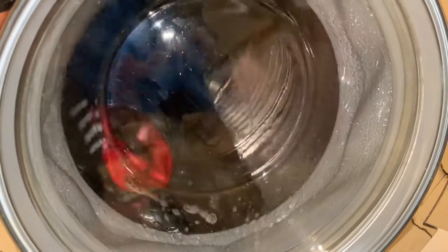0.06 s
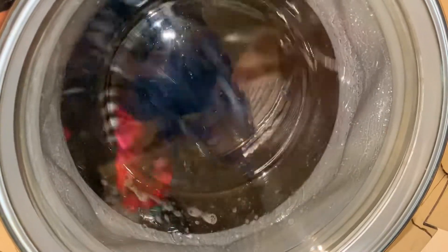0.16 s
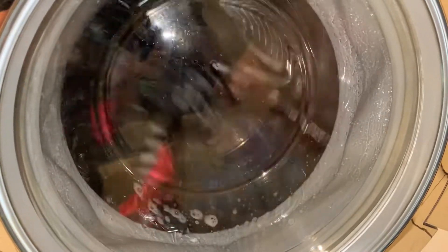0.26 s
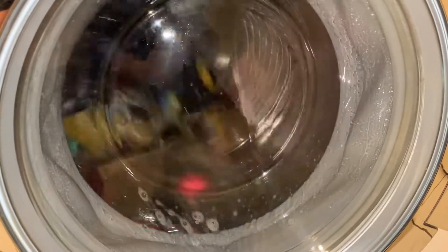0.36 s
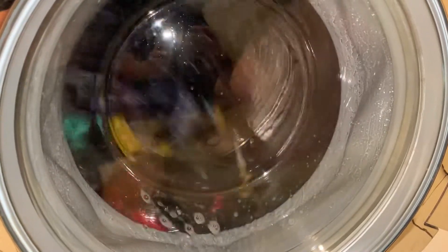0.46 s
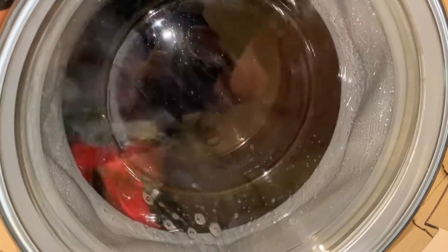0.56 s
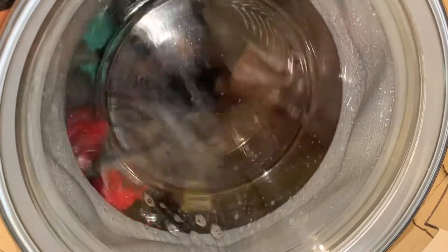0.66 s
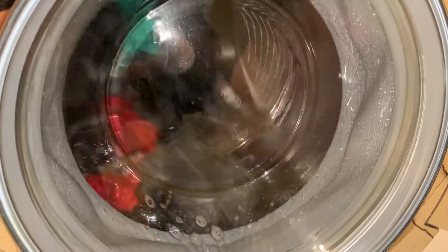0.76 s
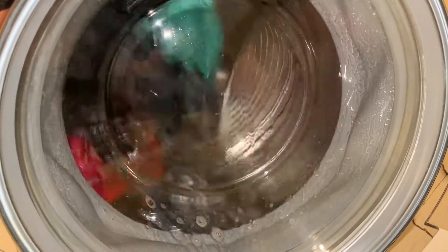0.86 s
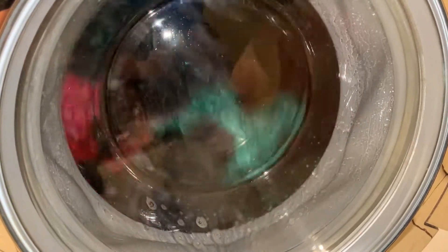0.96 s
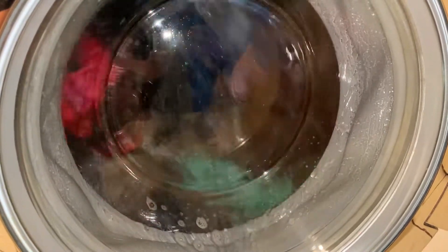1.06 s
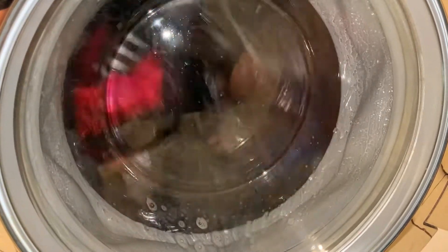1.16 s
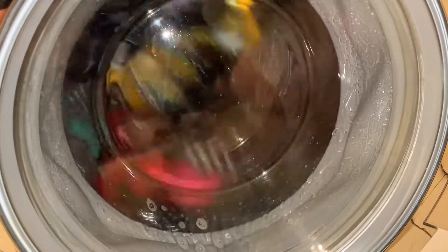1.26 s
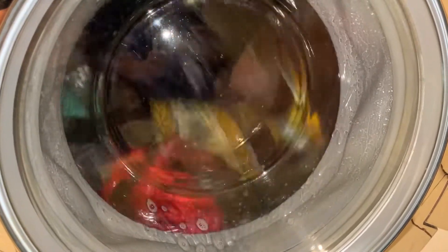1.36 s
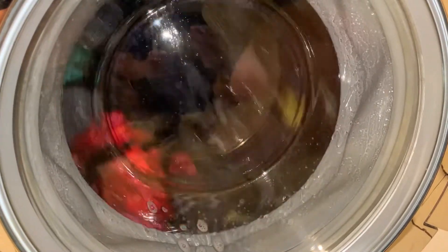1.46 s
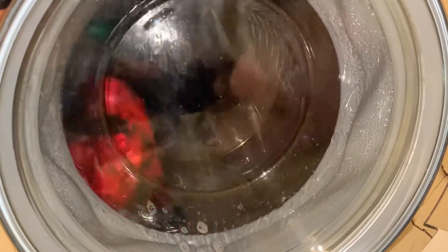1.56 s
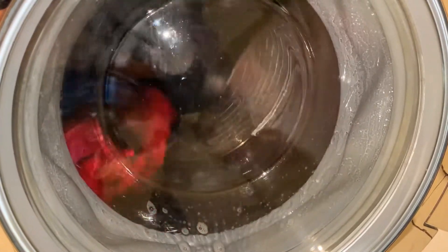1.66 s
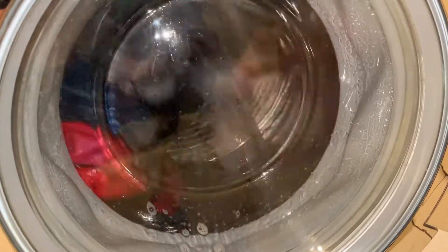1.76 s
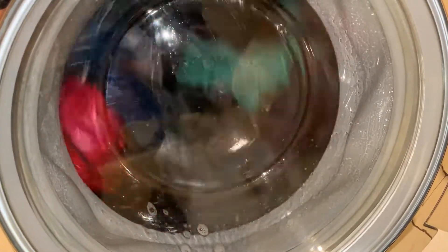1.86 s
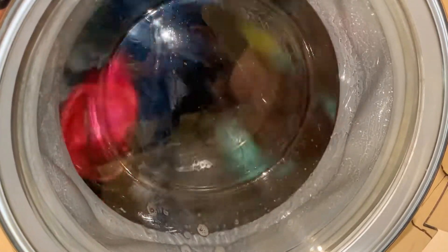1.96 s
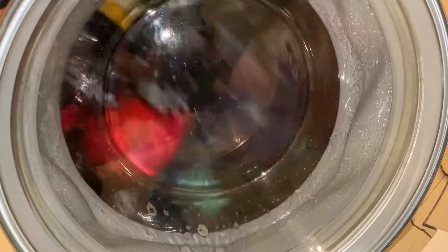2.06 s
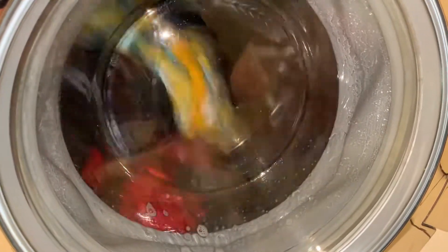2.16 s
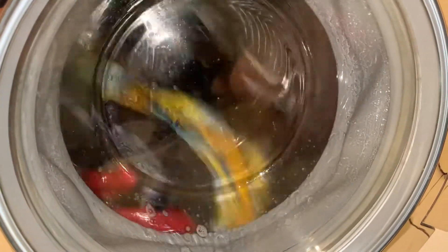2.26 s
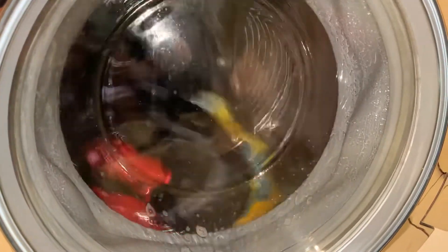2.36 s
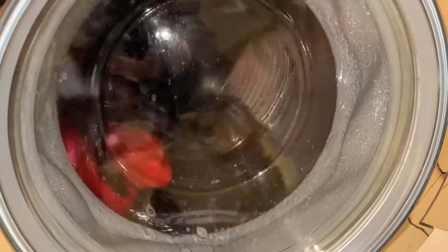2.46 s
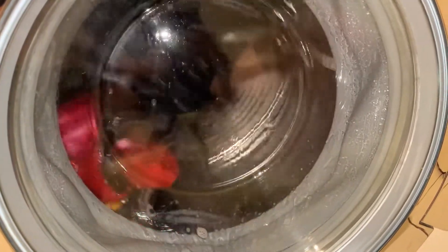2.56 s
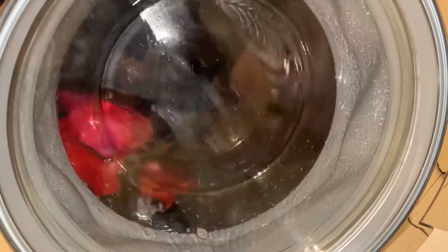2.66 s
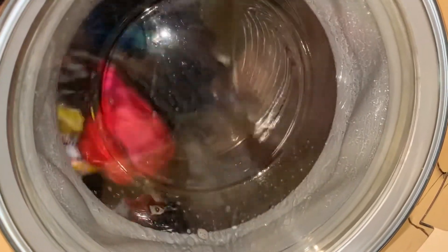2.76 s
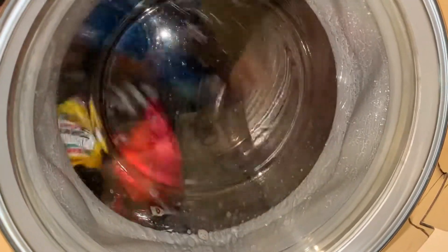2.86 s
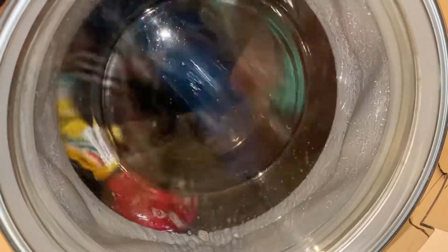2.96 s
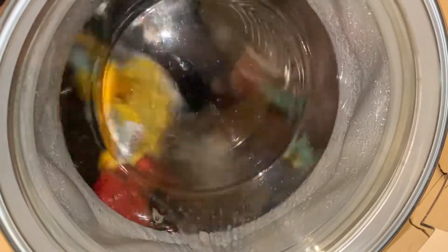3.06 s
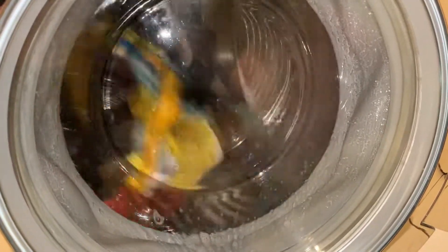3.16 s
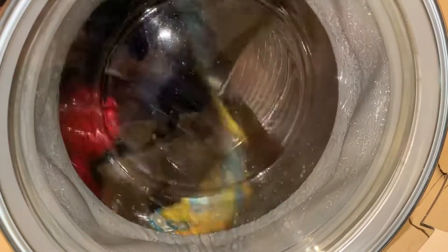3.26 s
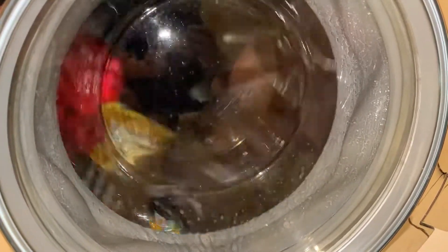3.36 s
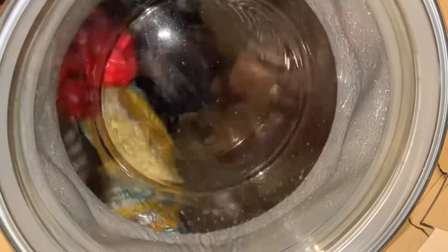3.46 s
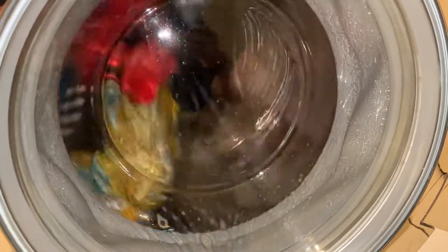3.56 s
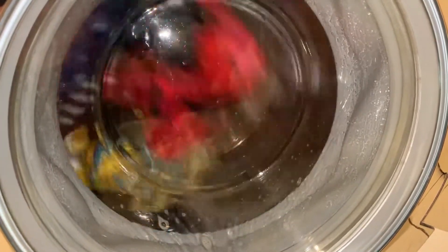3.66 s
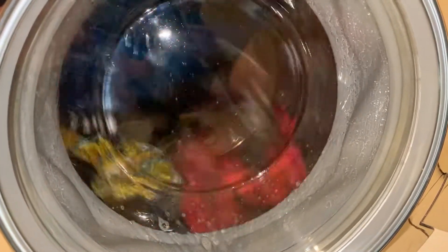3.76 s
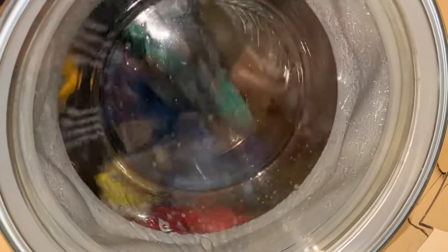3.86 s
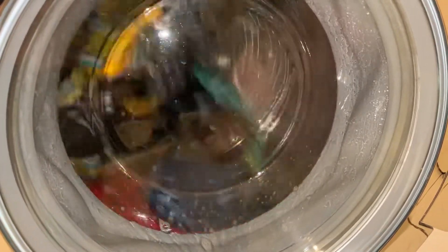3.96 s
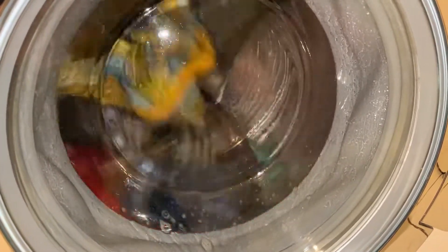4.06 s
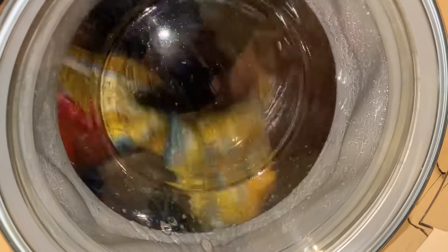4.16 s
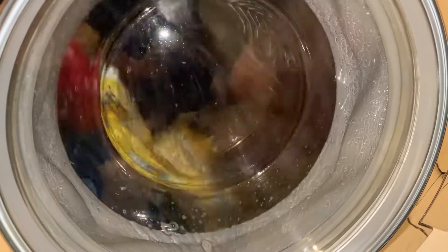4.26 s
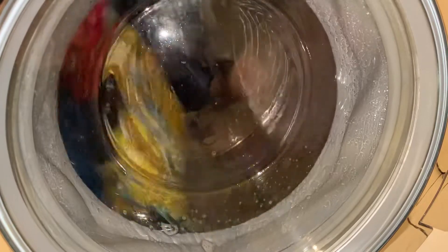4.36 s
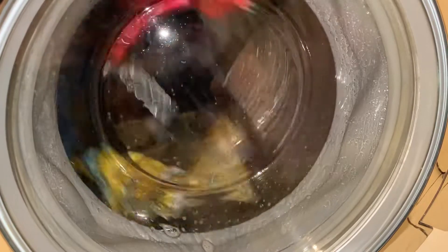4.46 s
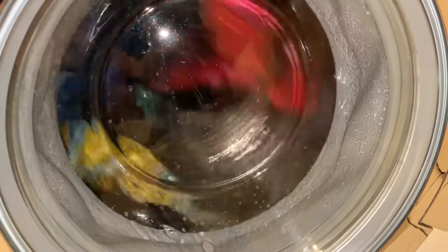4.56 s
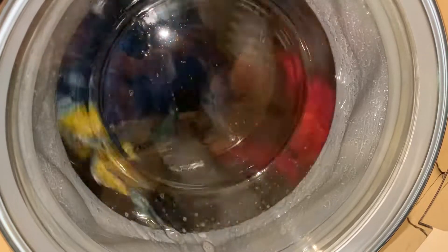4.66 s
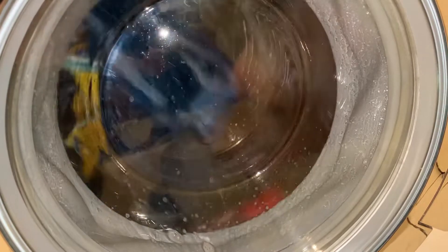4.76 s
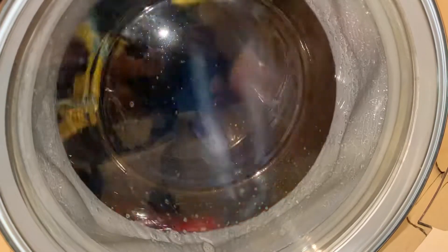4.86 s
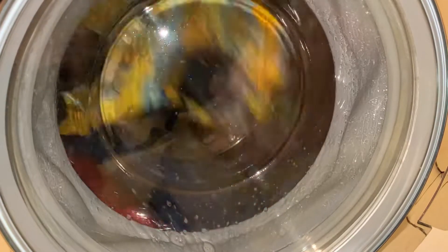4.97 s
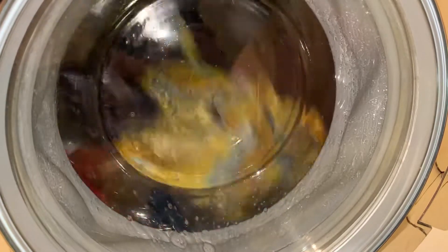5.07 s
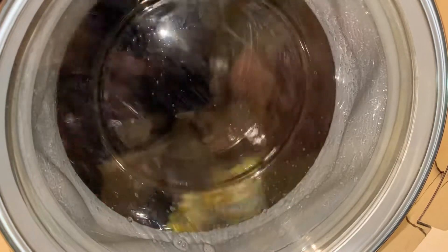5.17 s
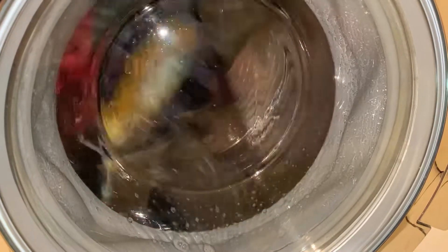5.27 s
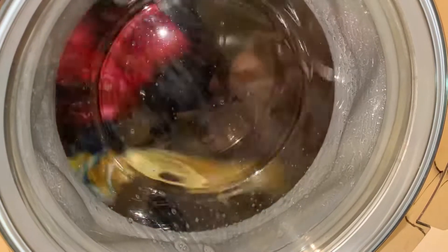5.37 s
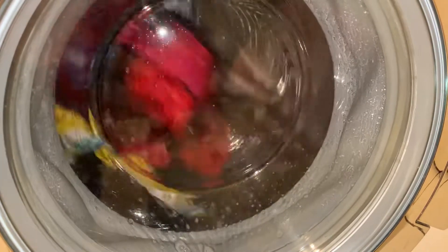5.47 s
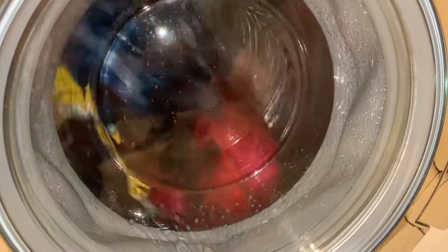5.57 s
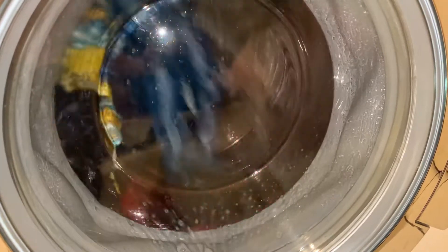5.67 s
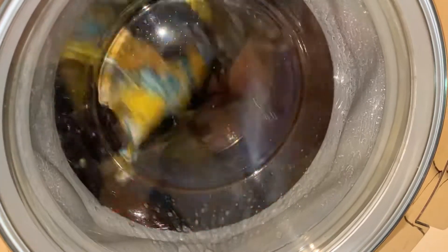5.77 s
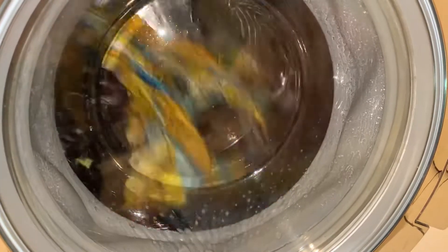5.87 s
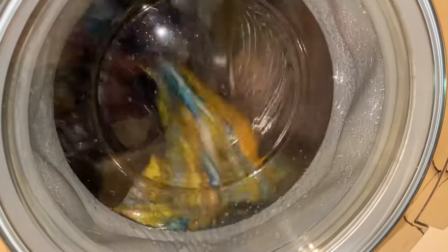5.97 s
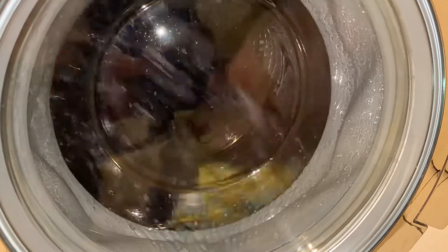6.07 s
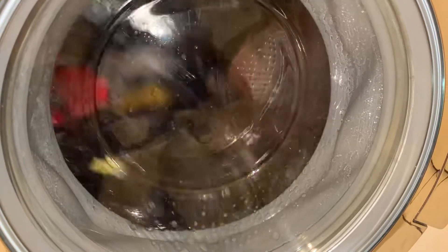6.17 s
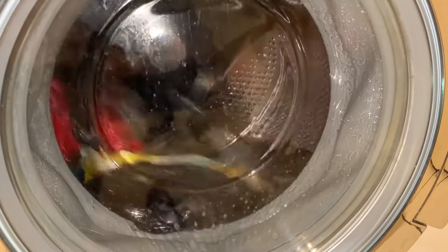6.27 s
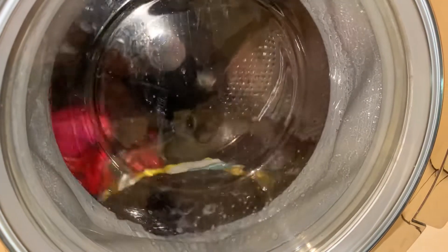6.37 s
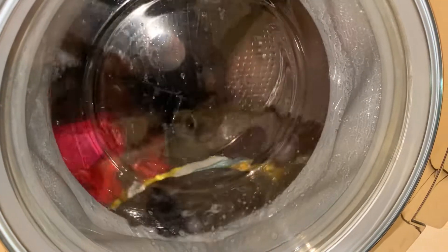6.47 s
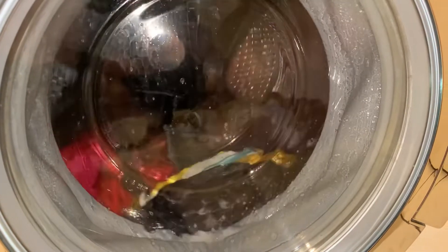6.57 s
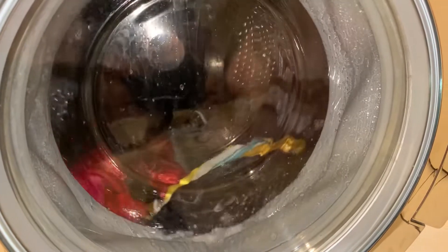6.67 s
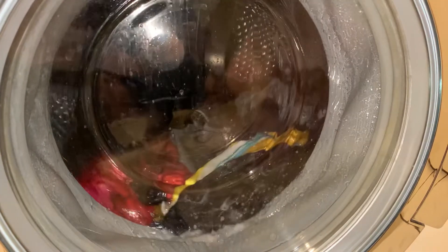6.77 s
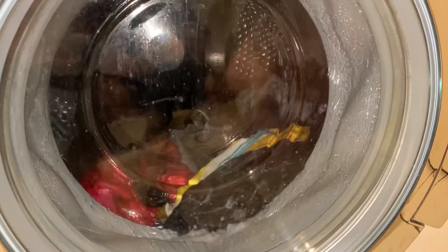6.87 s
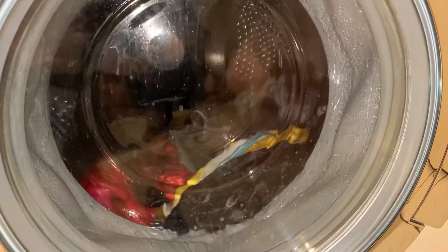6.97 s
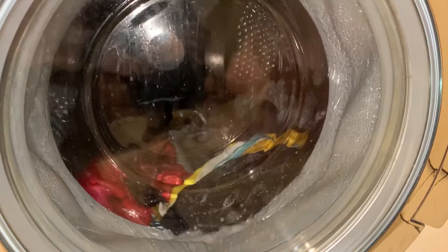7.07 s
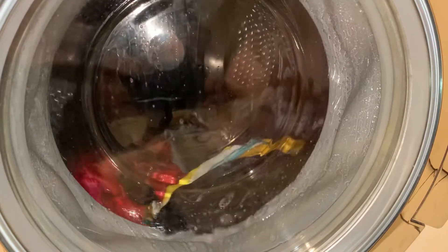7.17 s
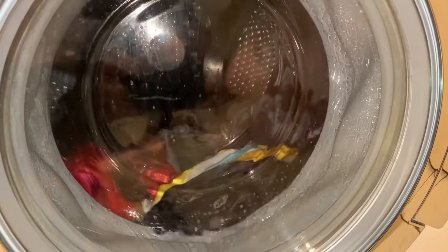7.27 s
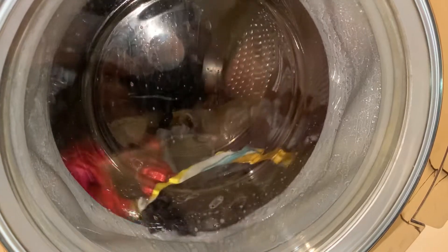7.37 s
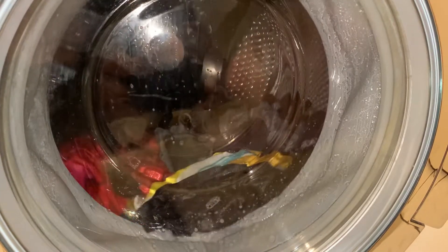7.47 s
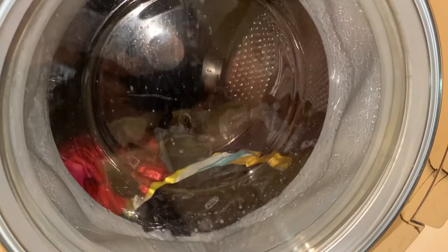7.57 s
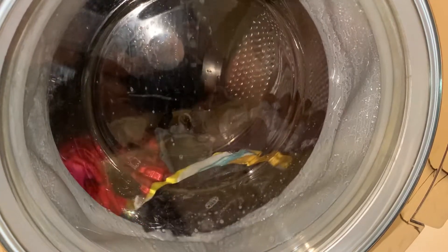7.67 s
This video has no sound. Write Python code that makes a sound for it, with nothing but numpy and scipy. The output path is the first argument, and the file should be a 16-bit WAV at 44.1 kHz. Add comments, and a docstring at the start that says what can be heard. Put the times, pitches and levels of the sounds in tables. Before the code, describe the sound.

Close to a washing machine door, sodden clothes flop and slosh over hum and brush hiss until a relay clicks and the drum stops.

```python
"""A front-loading washing machine tumbles wet laundry, heard from close to its door.
Clothes flop into the tub, exciting its resonant modes, and water swishes as filtered random impacts,
over the sines of a motor's hum, the resonant noise of its whine and the hiss of its brushes.
A relay clicks the motor off with decaying noise and ringing sines; the drum coasts to rest,
and the load slumps in a quiet room of shaped noise and faintly singing electronics."""
import sys
import numpy as np
from scipy import signal
from scipy.fft import rfft, irfft, next_fast_len
from scipy.io import wavfile
from scipy.ndimage import uniform_filter1d, map_coordinates

SR = 44100
rng = np.random.default_rng(int(sys.argv[2]) if len(sys.argv) > 2 else 0)


def digitize_waveform(pressure):
    """Quantize a signal to 16-bit integers and store it at the path in sys.argv[1].

    Rows of a 2-D input are taken as channels; values are limited to [-1, 1].
    """
    field = np.atleast_2d(pressure).T
    bounded = np.clip(field, -1, 1)
    quanta = np.round(bounded * 32767).astype(np.int16)
    wavfile.write(sys.argv[1], SR, quanta)


N = 340665
T = np.arange(N) / SR  # time [s]
TOP_HZ = 15000  # upper band limit

# wet garments landing: (time [s], swell time [s], relative level [dB],
# weight of the knock [dB], wetness of the slap [dB])
GARMENTS = [(0.25, 0.031, -48, 7.5, -11.5), (0.347, 0.077, -49, 7, -13.5), (0.56, 0.034, -48, 6, -13),
            (0.72, 0.03, -43.5, 1.5, -21), (1.018, 0.028, -40.5, 4, -15), (1.075, 0.024, -49.5, 4, -15),
            (1.149, 0.023, -51.5, 4.5, -5.5), (1.294, 0.025, -50, 9.5, -9.5),
            (1.415, 0.037, -47.5, 5.5, -11), (1.544, 0.029, -49.5, 8, -10.5),
            (1.834, 0.069, -55.5, -12, -2.5), (1.998, 0.014, -55.5, 17, -5), (2.105, 0.021, -49, 9.5, -7),
            (2.235, 0.049, -49.5, 10.5, -24.5), (2.338, 0.013, -54.5, 10.5, -2),
            (2.7, 0.061, -47.5, 3, -15.5), (2.932, 0.022, -38.5, 8, -15.5), (2.998, 0.022, -43.5, 7, -12),
            (3.297, 0.017, -45.5, -2.5, -14.5), (3.376, 0.017, -45, 9, -10), (3.49, 0.024, -48.5, 9, -7.5),
            (3.554, 0.024, -46, 6.5, -13), (3.648, 0.051, -45.5, 5.5, -13.5),
            (3.749, 0.093, -52.5, -4, -11), (4.11, 0.011, -57.5, 16.5, -27.5), (4.25, 0.028, -47.5, 10, -7),
            (4.377, 0.01, -46.5, 8, -13.5), (4.408, 0.022, -52, 8.5, -4), (4.651, 0.024, -46, 6.5, -11),
            (4.776, 0.012, -49, 10, -6.5), (4.846, 0.022, -46, 3.5, -21), (4.934, 0.018, -47, 9.5, -6),
            (5.029, 0.027, -46.5, 8.5, -11.5), (5.151, 0.042, -47.5, 6.5, -11),
            (5.349, 0.025, -46, 7.5, -10.5), (5.501, 0.014, -51.5, 9.5, -6.5),
            (5.595, 0.076, -49.5, 11, -13.5), (5.785, 0.032, -49, 7, -10.5), (5.903, 0.023, -42, -3.5, -15),
            (6.083, 0.031, -55.5, 17.5, -6.5), (6.155, 0.03, -49, 10.5, -11), (6.41, 0.027, -71, -8, -14.5),
            (6.453, 0.054, -73, 23, -27), (6.598, 0.021, -78.5, 24.5, -23), (6.728, 0.022, -74, 12, -16),
            (6.889, 0.031, -72.5, 9, -24)]
# modes of tub and cabinet: (frequency [Hz], half-width [Hz], relative level [dB])
TUB_MODES = [(41.8, 4.4, -10), (70.1, 3.25, 4.5), (85.8, 6.6, 3), (129.7, 11, -4), (144.8, 9.9, -9.5),
             (176.3, 10.2, -0.5), (186, 8.2, 2), (232, 38, -10.5), (283.6, 16, -4.5), (312.7, 12, -3.5),
             (341.8, 12, -7), (381.6, 13, -10.5), (413.6, 14, -12), (458, 19, -13.5), (526, 33, -17),
             (610, 16.7, -8), (657, 15, -6.5), (701, 25, -10.5), (791, 24, -12.5), (899, 190, -18.5),
             (979, 27, -15.5), (1460, 27, -20), (1500, 26, -27.5), (2720, 35, -31.5), (2835, 35, -28.5)]
# mains harmonics in the windings: (frequency [Hz], relative level [dB])
MAINS_LINES = [(99.8, -56), (199.6, -48), (299.6, -49), (399.4, -57)]
# relay contact and its bounces: (time [s], relative level [dB])
RELAY_CONTACTS = [(5.9677, -38.5), (5.9712, -35.5), (5.9762, -45.5)]
# the drum coasting to rest: (time [s], share of full drum speed [0-1])
COASTING = [(5.97, 0.99), (6.06, 0.87), (6.225, 0.46), (6.3, 0.32), (6.38, 0.11), (6.6, 0.03)]


def amp(db):
    """Decibels to amplitude: 20 dB are a factor of ten."""
    return 10 ** (np.asarray(db) / 20)


def unit(x):
    """Normalisation to an rms of 1."""
    return x / np.sqrt(np.mean(x ** 2) + 1e-20)


def along(points, hz):
    """Interpolation of (frequency [Hz], value) points on a logarithmic frequency axis."""
    f, v = np.transpose(points)
    return np.interp(np.log(hz + 1), np.log(f + 1), v)


def wobble(rate):
    """Slow random modulation: a smooth curve through random knots, rate knots a second."""
    knots = rng.standard_normal(int(N * rate / SR) + 4)
    return map_coordinates(knots, [T * rate])


def peaks(modes, hz):
    """Modal response: resonances add in power, with dark valleys between them."""
    return np.sqrt(sum(amp(2 * db) / (1 + ((hz - f) / w) ** 2) ** 2 for f, w, db in modes))


def band(hz, lo_hz, hi_hz):
    """Gain of a steep band-pass."""
    return 1 / np.sqrt((1 + (lo_hz / (hz + 1)) ** 12) * (1 + (hz / hi_hz) ** 12))


def rippled(spectrum, hz, ripple_db, spacing_hz=35, blend_hz=7000):
    """Modal overlap: many close cabinet resonances ripple a spectrum and blend together in the treble."""
    knots = hz / spacing_hz
    ripple = map_coordinates(rng.standard_normal(2048), [knots], mode="mirror")
    return amp(along(spectrum, hz) + ripple_db * ripple / (1 + (hz / blend_hz) ** 2))


def ringing(gain, size=32768):
    """Minimum phase: the causal impulse response of unit energy that has this gain curve."""
    g = gain(np.fft.rfftfreq(size, 1 / SR))
    cepstrum = irfft(np.log(g / g.max() + 1e-6))
    # folding the cepstrum onto positive times makes the response causal
    cepstrum[1:size // 2] *= 2
    cepstrum[size // 2 + 1:] = 0
    response = irfft(np.exp(rfft(cepstrum)))
    return response / np.linalg.norm(response)


def coloured(x, gain):
    """Linear filtering: x convolved with the impulse response of this gain curve."""
    return signal.fftconvolve(x, ringing(gain))[:N]


def noise(gain):
    """Filtered white noise of rms 1 with this gain curve."""
    return unit(coloured(rng.standard_normal(N), gain))


def contacts(rate, spread_db):
    """Shot noise: tiny random impacts of uneven size, rate a second, rms 1."""
    happens = rng.random(N) < rate / SR
    sign = rng.choice([-1, 1], N)
    return unit(happens * sign * amp(spread_db * rng.standard_normal(N)))


def even(x, span=0.13):
    """Level equalisation: x over its running rms, which removes slow swells and brings the rms near 1."""
    size = int(span * SR) + 1
    power = uniform_filter1d(uniform_filter1d(x * x, size), size // 2)
    return x / np.sqrt(np.abs(power) + 1e-12)


def patchy(x, depth_db, size=512):
    """Time-varying filtering: the colour of x shifts in patches of about 500 Hz by 40 ms."""
    z = signal.stft(x, nperseg=size)[2]
    field = uniform_filter1d(rng.standard_normal(z.shape), size=6, axis=0)
    field = uniform_filter1d(field, size=7, axis=1)
    return signal.istft(z * amp(depth_db * unit(field)), nperseg=size)[1][:N]


def blow(s, rise, t60):
    """Envelope of a damped blow that starts at s: an exponential rise and decay."""
    t = np.maximum(T - s, 0)
    return (1 - np.exp(-t / rise)) * np.exp(-np.log(1000) * t / t60)


def swells(rows):
    """Power summation of Gaussian swells given as (time [s], half-length [s], level [dB])."""
    return np.sqrt(sum(amp(2 * db) * np.exp(-2 * ((T - s) / half) ** 2) for s, half, db in rows))


def tones(lines, flutter_db, drift, shake=0.34):
    """Modulated sines: level and pitch waver, and the tumbling shakes their phase by some radians."""
    def line(hz):
        cycles = hz * np.cumsum(1 + drift * wobble(15)) / SR
        phase = 2 * np.pi * cycles + shake * wobble(30)
        return unit(amp(flutter_db * wobble(11)) * np.sin(phase))
    return sum(amp(db) * line(hz) for hz, db in lines)


def speed():
    """Coasting: the share of full drum speed at every sample; at the end the drum stands still."""
    return np.clip(np.interp(T, *np.transpose(COASTING), right=0), 0, 1)


def powered(coast_t60=0.13):
    """Exponential decay of the motor's drive once the relay opens."""
    return amp(-60 * np.maximum(T - RELAY_CONTACTS[0][0], 0) / coast_t60)


def rolling(db):
    """Level of the load rolling along with the drum between the falls, proportional to drum speed."""
    return amp(db) * speed()


def pats(rate, lo_hz, hi_hz, spread_db=2.0):
    """Modal excitation: soft random contacts, rate a second, ring the tub's modes in one range."""
    return even(coloured(contacts(rate, spread_db), lambda hz: peaks(TUB_MODES, hz) * band(hz, lo_hz, hi_hz)))


def landings(hit_db=-0.77, slosh_db=-11, slosh_slower=2.13):
    """Impact envelopes of knock, ring and slap: cloth swells against the drum, then sloshes on more slowly."""
    power = np.zeros((3, N))

    def swelling(u):
        return u * np.exp(1 - u)

    for s, swell, db, weight_db, wet_db in GARMENTS:
        start = round(s * SR)
        u = T[:min(SR, N - start)] / swell
        hit = amp(hit_db) * swelling(u)
        slosh = amp(slosh_db) * swelling(u / slosh_slower)
        levels = amp([[db + weight_db], [db], [db + wet_db]])
        power[:, start:start + len(u)] += (levels * np.hypot(hit, slosh)) ** 2
    return np.sqrt(power)


def thuds(thud_db=0, roll_db=-52.5):
    """Low-mode excitation: each heap leans into the tub and stirs its lowest modes."""
    # heaps of laundry sinking heavily into the tub:
    # (time at the heaviest [s], half-length [s], relative level [dB])
    heap_rows = [(0.03, 0.095, -45), (0.447, 0.11, -43.5), (0.663, 0.057, -45), (0.917, 0.18, -42.5),
                 (1.11, 0.056, -39.5), (1.262, 0.081, -38), (1.676, 0.059, -40.5), (2.055, 0.093, -38),
                 (2.278, 0.099, -41), (2.454, 0.071, -40), (2.86, 0.054, -43.5), (3.105, 0.11, -43),
                 (3.708, 0.1, -40.5), (4.118, 0.057, -40.5), (4.498, 0.071, -35.5), (4.936, 0.099, -39),
                 (5.324, 0.12, -37.5), (5.676, 0.068, -37.5), (5.94, 0.17, -43.5), (6.285, 0.079, -43.5),
                 (6.495, 0.044, -46), (6.56, 0.11, -49.5), (6.96, 0.14, -67), (7.627, 0.23, -69)]
    return amp(thud_db) * np.hypot(rolling(roll_db), swells(heap_rows)) * pats(150, 30, 133.0)


def drumming(knock, roll_db=-46.5, boom_db=-2.0, drum_db=-2.0, soft=0.65, lurch_db=2.5):
    """Mid-mode excitation: the load rolls over in lurches, garments knock and soft pats boom in the tub."""
    force = soft + (1 - soft) * speed()  # a resting load stirs the higher modes less
    boom = amp(boom_db) * pats(220, 131.0, 218)
    drum = amp(drum_db) * force * pats(300, 220.5, 506)
    return np.hypot(rolling(roll_db + lurch_db * wobble(12)), knock) * (boom + drum)


def steel(ring, roll_db=-51.5, ring_db=-4, first_db=5.0, firm_at=0.96):
    """Impulse response of the higher modes: each garment is one firm contact inside a flurry of small ones."""
    first = np.zeros(N)
    for s, swell, db, _, _ in GARMENTS:
        first[round((s + firm_at * swell) * SR)] += amp(db + first_db)  # firm_at in swell times
    firm = coloured(first, lambda hz: peaks(TUB_MODES, hz) * band(hz, 450, 1100))
    flurry = np.hypot(rolling(roll_db), ring) * pats(500, 477, 1110, spread_db=1.5)
    return firm + amp(ring_db) * flurry


def slaps(slap, slap_db=7):
    """Filtered shot noise: wet cloth smacks the steel in a burst of small contacts."""
    # spectrum of wet cloth on steel: (frequency [Hz], relative density [dB])
    cloth_spectrum = [(250, -20.5), (500, -9.5), (750, 6.5), (1050, -4.5), (1500, -9.5), (2400, -18),
                      (2850, -13), (3300, -26.5), (4500, -49.5), (8000, -47.5), (15000, -68)]
    wet = coloured(contacts(1500, 4.8), lambda hz: amp(along(cloth_spectrum, hz)))
    return amp(slap_db) * slap * patchy(even(wet), depth_db=1.0)


def water(slap, roll_db=-68, swish_db=8, squeeze=0.5, spray_db=-82, spray_grows=0.95):
    """Filtered shot noise: water swishes through rolling cloth; landings squeeze out more and throw up spray."""
    # spectrum of the swish: (frequency [Hz], relative density [dB])
    swish_spectrum = [(250, -47.5), (500, -5.5), (700, 4), (1000, -10), (1400, -5), (1900, -16),
                      (2350, -11), (2550, -18), (2750, -10), (3200, -31), (4500, -24.5), (8000, -41),
                      (13000, -58), (16000, -56.5)]
    # rough treble colour of the fizz, with arbitrary dips near 9 and 11 kHz:
    # (frequency [Hz], relative density [dB])
    fizz_colour = [(2000, -3.5), (4500, 8), (5500, 8), (7700, 15.5), (8900, -2.5), (10100, 15), (11300, -5),
                   (13200, 4.5), (14500, -15)]
    # water thrown from the load: (time at the densest [s], half-length [s], relative level [dB])
    spray_bursts = [(1.16, 0.08, -74.5), (2.06, 0.079, -72.5), (3.03, 0.064, -77), (6.105, 0.022, -77),
                    (6.21, 0.019, -79)]
    flow = np.hypot(rolling(roll_db), squeeze * slap)
    swish = coloured(contacts(1800, 0.69), lambda hz: rippled(swish_spectrum, hz, ripple_db=2.0))
    swish = patchy(even(swish), depth_db=3.0)
    fizz = coloured(contacts(6000, 3.8), lambda hz: rippled(fizz_colour, hz, ripple_db=5.5))
    fizz = patchy(even(fizz), depth_db=2.0)
    spray = amp(spray_db + 1.1 * wobble(15)) * (flow / amp(roll_db)) ** spray_grows
    return amp(swish_db) * flow * swish + np.hypot(spray * speed(), swells(spray_bursts)) * fizz


def tub_knocks(focus, detune=0.011, cushion_s=0.003):
    """Modal impulse response: a knock rings the tub modes near its pitch, detuned by the shifting load."""
    # knocks on the tub, a heavy one written as several rows of different pitch:
    # (time [s], relative peak level [dB], pitch that the row favours [Hz])
    knock_rows = [(0.308, -35, 185), (0.349, -37, 700), (0.567, -38, 693), (0.587, -31, 182),
                  (0.727, -36, 697), (0.817, -33, 188), (0.901, -36, 300), (0.951, -34.5, 186),
                  (1.03, -36, 760), (1.151, -42, 780), (1.239, -44, 680), (1.273, -39, 780),
                  (1.333, -29.5, 185), (1.347, -39.5, 689), (1.56, -34.5, 188), (1.656, -33, 300),
                  (1.974, -46.5, 1400), (2.034, -28, 173), (2.11, -40, 700), (2.263, -39, 676),
                  (2.395, -32, 183), (2.936, -30, 520), (2.937, -46.5, 2830), (2.942, -40, 1400),
                  (2.944, -20, 289.5), (2.947, -25.5, 700), (2.968, -23.5, 290), (2.981, -31.5, 190),
                  (3.019, -30.5, 303), (3.307, -35.5, 190), (3.383, -45, 1400), (3.879, -32.5, 301),
                  (4.116, -34, 703), (4.173, -32, 189), (4.303, -33.5, 182), (4.38, -40.5, 750),
                  (4.428, -31, 297), (4.497, -37, 749), (4.789, -39.5, 700), (4.847, -40.5, 750),
                  (4.951, -27, 290), (4.976, -26, 182), (5.159, -38.5, 696), (5.164, -46.5, 2150),
                  (5.188, -30, 178), (5.228, -29, 308), (5.283, -32, 187), (5.589, -37.5, 700),
                  (5.754, -47.5, 1500), (5.824, -38, 697), (5.922, -49.5, 2860), (6.125, -32, 304),
                  (6.163, -45.5, 1400), (6.198, -42, 185), (6.455, -36.5, 83), (6.476, -36.5, 131),
                  (6.483, -53, 728), (6.52, -41, 184), (6.547, -45, 285), (6.599, -48, 182),
                  (6.602, -62, 700), (6.733, -60, 700), (6.736, -54, 335), (6.764, -52, 330),
                  (6.9, -59, 175), (6.934, -55.5, 142), (7.111, -73, 89.4), (7.391, -65, 175),
                  (7.449, -61.5, 172), (7.61, -61.5, 163)]
    out = np.zeros(N + SR)
    shifts = 1 + detune * rng.standard_normal(len(knock_rows))
    for (s, db, pitch), shift in zip(knock_rows, shifts):
        def favoured(hz):
            return peaks(TUB_MODES, hz * shift) / (1 + (focus * np.log((hz + 1) / pitch)) ** 4)
        boom = ringing(favoured, size=16384)
        boom = boom * (1 - np.exp(-T[:len(boom)] / cushion_s))  # the cloth cushions the first contact
        out[round(s * SR):][:len(boom)] += amp(db) * boom / np.abs(boom).max()
    return out[:N]


def motor(whine_db=-63.0, brush_db=-68.0, buzz=0.27, flutter_db=1.1, hiss_grows=2.5):
    """Resonant noise: the housing whines and flutters while powered; brushes hiss until the rotor stops."""
    # resonances of the motor housing: (frequency [Hz], half-width [Hz], relative level [dB])
    housing_modes = [(2354, 44, -4), (3345, 30, 2), (3434, 42, 5.5), (3590, 16, 3.5), (3646, 16, 1),
                     (3738, 37, 0.5), (3784, 37, 0), (3905, 80, -11)]
    # rough colour of the motor's hiss, with arbitrary dips near 9 and 12 kHz:
    # (frequency [Hz], relative density [dB])
    hiss_colour = [(300, 1), (700, 6.5), (1300, 10.5), (1900, 17), (2350, 10.5), (3100, 17.5), (3800, 4),
                   (4150, 4.5), (4750, 12), (5400, 0.5), (6100, 6.5), (7700, 6), (8900, -6), (10100, 8.5),
                   (11200, 1), (12000, -20.5), (13200, -4.5), (14500, -23.5)]
    surge = 1 + buzz * np.sin(2 * np.pi * MAINS_LINES[0][0] * T)  # current peaks twice a mains cycle
    housing = even(coloured(surge * rng.standard_normal(N), lambda hz: peaks(housing_modes, hz)))
    whine = amp(whine_db + flutter_db * wobble(15)) * housing
    hiss = amp(brush_db) * noise(lambda hz: rippled(hiss_colour, hz, ripple_db=6.0))
    return powered() * whine + speed() ** hiss_grows * hiss


def hum():
    """Harmonic vibration: windings hum on mains harmonics; the rotor's lines waver with the shifting load."""
    # lines of the turning rotor: (frequency [Hz], relative level [dB])
    rotor_lines = [(68.7, -53.5), (547, -63.5), (784, -70), (937, -77), (1346, -87.5), (1766, -79)]
    windings = tones(MAINS_LINES, flutter_db=3.5, drift=0.0035)
    rotor = tones(rotor_lines, flutter_db=10.5, drift=0.00794)
    return powered() * (windings + rotor)


def relay(snap_t60=0.015, rattle_db=-18, rattle_t60=0.36, rattle_top_hz=9500,
          ring_db=-17.5, crack_db=-7, crack_t60=0.004, crack_hz=9500):
    """Damped impact: the relay cracks open and bounces; its bracket rings and the cabinet rattles, duller."""
    # spectrum of the relay's body: (frequency [Hz], relative density [dB])
    body_spectrum = [(200, -26), (700, 10.5), (1100, 9.5), (2000, -14.5), (2900, 2.5), (3500, 3),
                     (4100, 2.5), (5000, -14), (7500, -7), (8600, -13), (9800, -7), (12500, -21.5),
                     (15000, -19.5)]
    # modes of its metal bracket: (frequency [Hz], relative level [dB], decay by 60 dB [s])
    bracket_modes = [(2680, -0.5, 0.23), (3150, 5, 0.13), (3490, -20, 0.34), (3830, 1, 0.19),
                     (4080, 19, 0.03), (4240, -2, 0.23), (4360, -10, .2), (6050, -6, 0.16),
                     (6980, -5, 0.18), (8380, -1.5, 0.078)]

    def body(hz):
        return rippled(body_spectrum, hz, ripple_db=3.5)

    def blows(rise, t60):
        return sum(amp(db) * blow(s, rise, t60) for s, db in RELAY_CONTACTS)

    snap = blows(0.00016, snap_t60) * noise(body)
    rattle = blows(0.0015, rattle_t60) * noise(lambda hz: body(hz) / (1 + (hz / rattle_top_hz) ** 2))
    s, db = RELAY_CONTACTS[0]
    crack = blow(s, 0.0001, crack_t60) * noise(lambda hz: band(hz, crack_hz, TOP_HZ))
    ring = sum(amp(level) * blow(s, 0.0008, t60) * np.sin(2 * np.pi * hz * (T - s))
               for hz, level, t60 in bracket_modes)
    return snap + amp(rattle_db) * rattle + amp(db + crack_db) * crack + amp(db + ring_db) * ring


def room_tone(room_db=-74, idle_db=-91.0, extra_db=8, settle_s=0.45, waver_db=-0.5):
    """Stationary noise of still air, independent per ear; electronics sing faintly, waver and settle."""
    # spectrum of the still room: (frequency [Hz], relative density [dB])
    air_spectrum = [(15, -22), (35, -7), (175, -6.5), (400, -17.5), (650, -16), (1050, -26.5), (2100, -27),
                    (3500, -27), (7000, -32.5), (14000, -33)]
    # faint singing of the electronics: (frequency [Hz], half-width [Hz], relative level [dB])
    singing_modes = [(1670, 60, -5), (2430, 60, -6.5), (2715, 25, -2.5), (2770, 28, 2.5), (3300, 45, -2.5),
                     (3610, 70, -8), (4570, 42, -6)]
    air = np.array([noise(lambda hz: amp(along(air_spectrum, hz))) for _ in range(2)])
    # the singing settles once the drum has almost stopped
    settling_db = extra_db * np.exp(-np.maximum(T - COASTING[-2][0], 0) / settle_s)
    singing = even(noise(lambda hz: peaks(singing_modes, hz)))
    return amp(room_db) * air + amp(idle_db + settling_db + waver_db * wobble(6)) * singing


def ports(x, lag, t60, echo_db):
    """Interaural delay and reverberation: the left port leads by lag [s]; reflections differ between ports."""
    # reflections of floor and walls: (frequency [Hz], relative level [dB])
    echo_spectrum = [(60, -10), (200, -24.5), (400, -5), (750, -8), (1300, -1), (2500, -4), (3500, 7.5),
                     (4500, 1.5), (9000, 1)]
    size = next_fast_len(N + SR)
    hz, t = np.fft.rfftfreq(size, 1 / SR), T[:SR // 4]
    walls = rfft(rng.standard_normal(len(t)) * amp(-60 * t / t60), size)
    echo = walls / np.abs(walls) * amp(along(echo_spectrum, hz) + echo_db)
    side = irfft(rfft(x, size) * (echo + 1j * np.sin(np.pi * hz * lag)))[:N]
    return np.array([x + side, x - side])


def roaming(x, near_lag=.00009, far_lag=0.00028):
    """Moving source: the load shifts between drum middle and side, each place with its own reflections."""
    share = (1 + np.tanh(2 * wobble(5.3))) / 2
    middle, side = (ports(x, lag=lag, t60=.17, echo_db=-1.0) for lag in (near_lag, far_lag))
    return share * middle + (1 - share) * side


def scene(left_db=-0.73, right_db=-0.03):
    """Superposition: the sounds of load, drive and room add, load and drive each with their own placing."""
    knock, ring, slap = landings()
    sources = [thuds() + drumming(knock), steel(ring), slaps(slap), water(slap), tub_knocks(focus=3.11)]
    tub = sum(roaming(x) for x in sources)
    drive = ports(motor() + relay(), lag=0.00036, t60=0.16, echo_db=-6.0)
    drive = drive + ports(hum(), lag=0.0003, t60=.17, echo_db=-3.5)
    return (tub + drive) * amp([[left_db], [right_db]]) + room_tone()


def record(dry):
    """Band limitation: a steep elliptic low-pass removes the sound above the upper limit."""
    return signal.sosfilt(signal.ellip(10, .1, 90, TOP_HZ, fs=SR, output="sos"), dry)


dry = scene()
out = record(dry)
digitize_waveform(out)
```